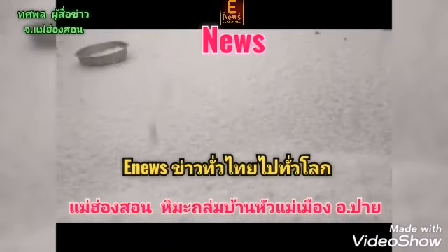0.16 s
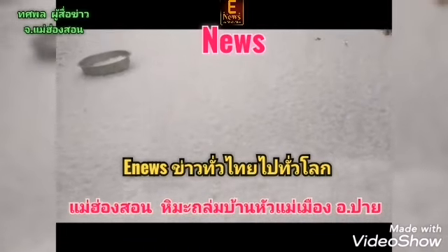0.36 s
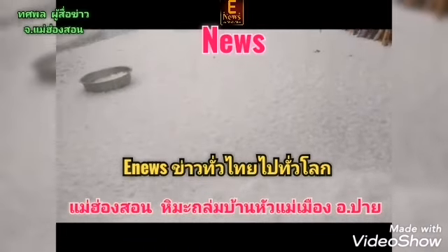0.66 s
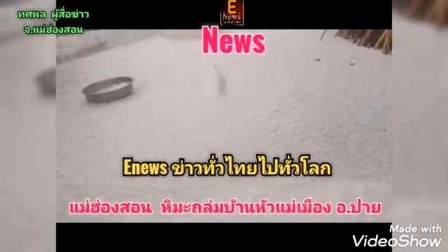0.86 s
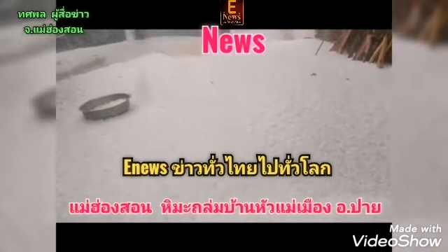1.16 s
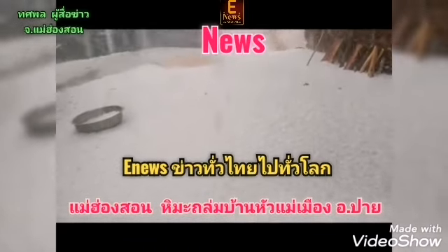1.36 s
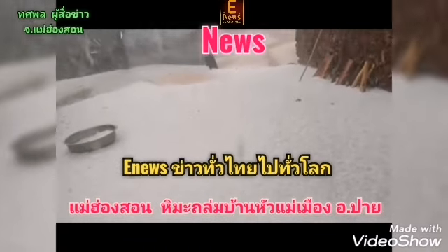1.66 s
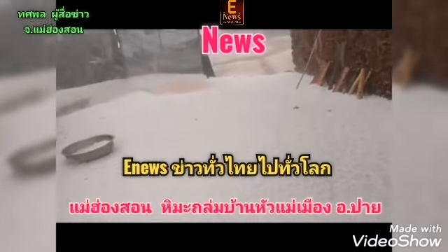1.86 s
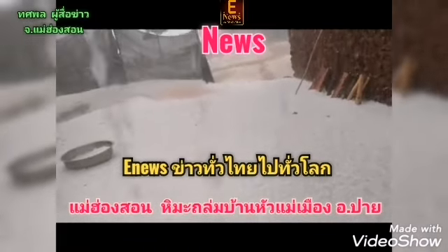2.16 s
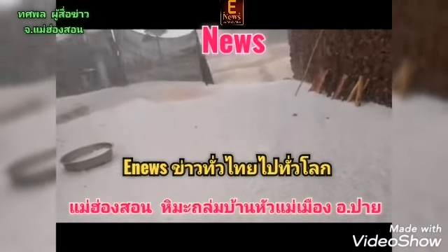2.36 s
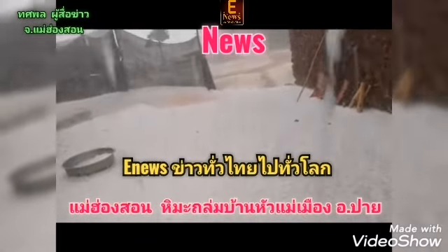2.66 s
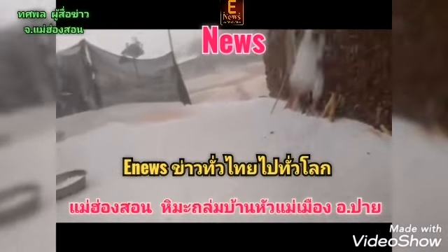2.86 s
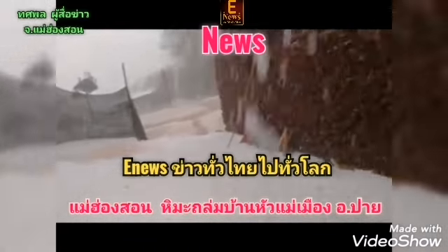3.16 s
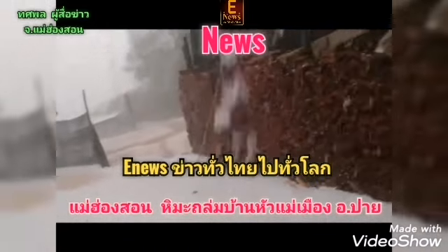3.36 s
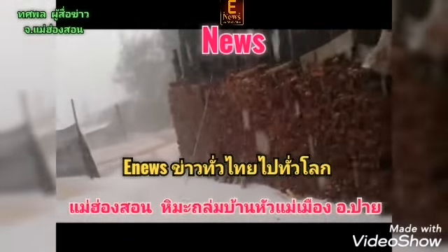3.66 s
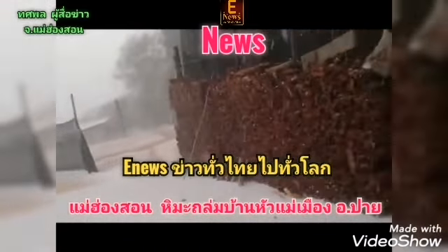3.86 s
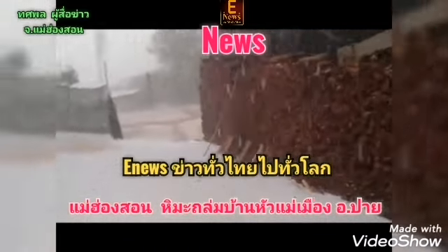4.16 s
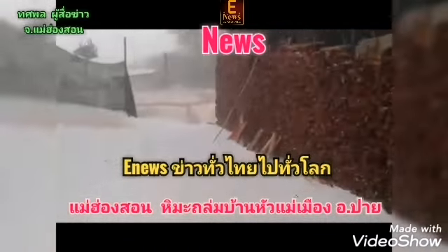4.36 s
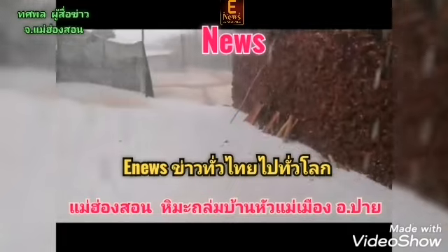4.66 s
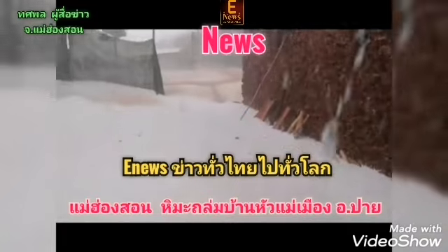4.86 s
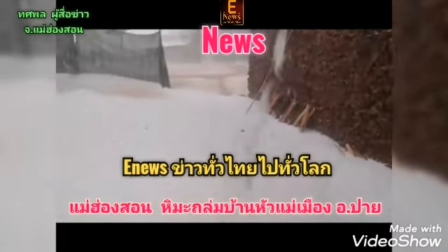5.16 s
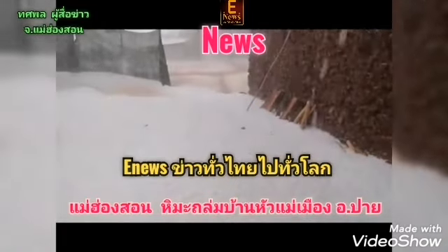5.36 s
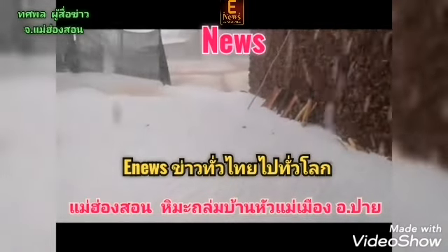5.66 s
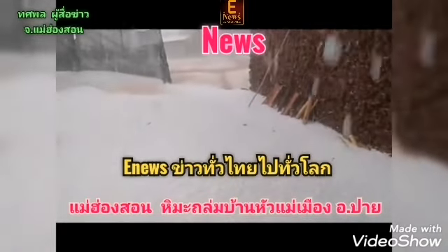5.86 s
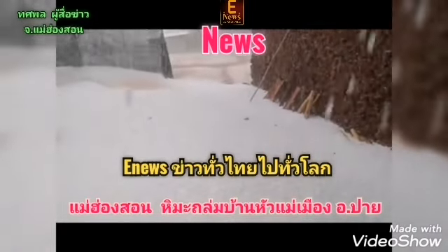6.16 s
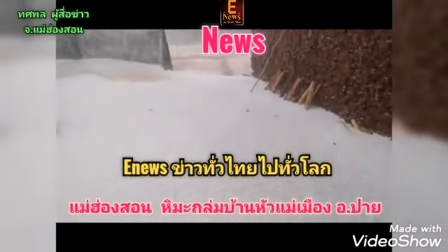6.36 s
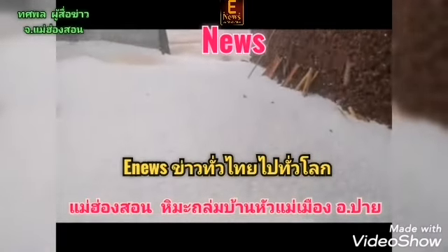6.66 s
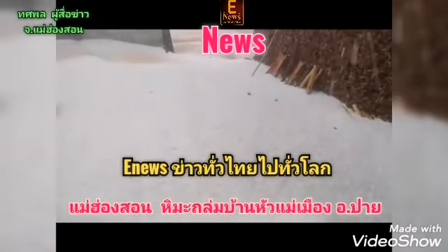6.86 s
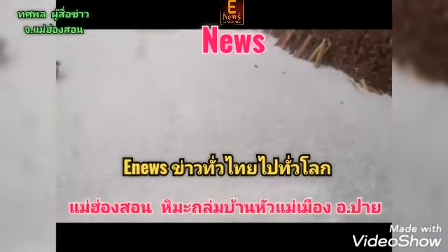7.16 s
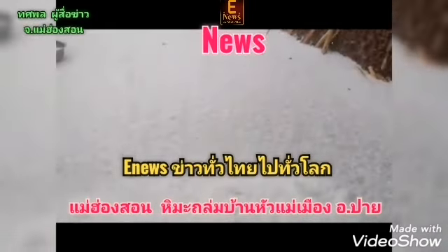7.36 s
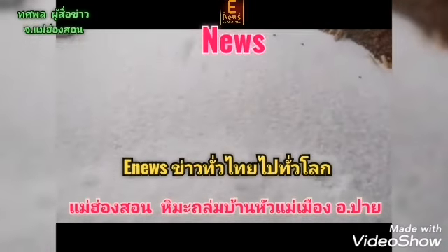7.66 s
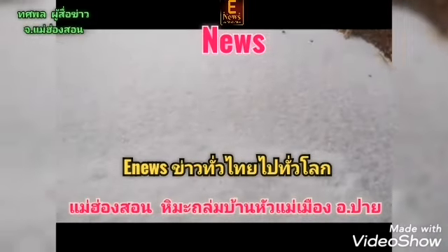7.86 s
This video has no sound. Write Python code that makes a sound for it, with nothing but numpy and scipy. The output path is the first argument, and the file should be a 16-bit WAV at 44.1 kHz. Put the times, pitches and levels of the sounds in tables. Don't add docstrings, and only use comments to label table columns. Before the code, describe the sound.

A loud, steady hissing roar of hail and downpour hammering metal sheets close above a phone microphone, fluttering slightly, without any pause.

```python
import sys
import numpy as np
from scipy import signal
from scipy.fft import rfft, irfft
from scipy.io import wavfile
from scipy.ndimage import uniform_filter1d

SR = 44100
rng = np.random.default_rng(int(sys.argv[2]) if len(sys.argv) > 2 else 0)


def unload_audio(sound):
    columns = np.transpose(np.atleast_2d(sound))
    steps = np.round(np.clip(columns, -1, 1) * 32767)
    wavfile.write(sys.argv[1], SR, steps.astype(np.int16))


def magnitude_from_level(level_db):
    exponent = np.asarray(level_db, float) / 20
    return 10 ** exponent


N = 352800
FRAME, GRID = 1024, 10


def gust_drift(rate_hz):
    hold = int(SR / rate_hz)
    steps = np.repeat(rng.standard_normal(N // hold + 1), hold)
    return 0.77 * uniform_filter1d(steps, hold)[:N]


def hail_blows(rate_hz, scatter_db):
    when, size, sign = rng.random((int(N / 2), 3)).T
    landed = np.arange(len(when)) < rate_hz * N / SR
    strength = magnitude_from_level(-scatter_db * np.log(1 - size))
    hits = landed * np.sign(sign - 0.5) * strength
    return np.bincount((when * N).astype(int), hits, N)


def heard_colour(hz):
    # frequency in Hz, level in dB per Hz.
    roof_colour = [(12, -40), (22, -12), (40, -20.5), (72, -15), (100, -17), (370, -12), (680, -9.5),
                   (900, -6), (1500, -4.5), (3600, -10), (4300, -12), (6500, -19), (8000, -19),
                   (13500, -19)]
    # centre in Hz, width in Hz, boost in dB.
    resonances = [
        (280, 10, 2),
        (322, 8.6, 2.5),
        (367, 6.6, 3),
        (890, 24, 1.5),
        (2405, 788, 12.5),
        (1050, 105, 2),
    ]
    colour_hz, colour_db = np.transpose(roof_colour)
    colour = magnitude_from_level(np.interp(np.log(hz), np.log(colour_hz), colour_db))
    for centre_hz, width_hz, db in resonances:
        colour = colour * magnitude_from_level(db * np.exp(-((hz - centre_hz) / width_hz) ** 2))
    return colour


def drumming_roof():
    # time in seconds, roar level in dB.
    hail_fall = [(0.0, -16.5), (0.42, -17.5), (0.51, -17), (0.56, -18.5), (2.03, -17.5), (4.68, -17.5),
                 (4.92, -19.5), (4.99, -17.5), (5.17, -20.5), (5.26, -18), (6.15, -18.5), (6.21, -17),
                 (6.46, -18.5), (6.75, -18), (7.98, -19), (8.0, -20)]
    time_s, fall_db = np.transpose(hail_fall)
    hz = np.maximum(np.arange(N // 2 + 1) * SR / N, 1)

    fade = np.exp(-np.arange(4096) / SR / 0.0039)
    smear = rfft(rng.standard_normal(4096) * fade, N)
    blows = rfft(hail_blows(rate_hz=15000, scatter_db=1.5)) * np.exp(1j * np.angle(smear))
    ringing = blows * heard_colour(hz)

    low = 1 / (1 + (hz / 750) ** 4)
    high = 1 / (1 + (3700 / hz) ** 4)
    body, drumming, spray = [irfft(ringing * share, N) for share in (1 - low - high, low, high)]

    roar_db = np.interp(np.arange(N) / SR, time_s, fall_db)
    swell_db = roar_db - roar_db.mean()
    drum_db = (0.19 - 1) * swell_db + 0.5 * gust_drift(4)
    spray_db = (0.97 - 1) * swell_db + 0.3 * gust_drift(4.26)
    drum_db = drum_db - drum_db.mean() + 1.4 * gust_drift(11)
    spray_db = spray_db - spray_db.mean() + 1.27 * gust_drift(30)
    together = body + drumming * magnitude_from_level(drum_db) + spray * magnitude_from_level(spray_db)
    return magnitude_from_level(roar_db - 0.4) * together / np.std(body)


def scene():
    return np.tile(drumming_roof(), (2, 1))


def lapped_waves(bins=640):
    n = np.arange(2 * FRAME)[:, None] + 0.5
    k = np.arange(bins) + 0.5
    fade = np.sin(np.pi * n / 2 / FRAME)
    return np.sqrt(2 / FRAME) * fade * np.cos(np.pi / FRAME * (n + FRAME / 2) * k)


def whistling_edges(mid):
    # edge number (32 bins apart), dB above the tile.
    edge_whistles = [(12, 1), (13, 6), (14, 1), (15, 6), (16, 10), (17, 13), (18, 10.5), (19, 44)]
    # time in seconds, level in dB.
    top_whistle = [
        (0, -49),
        (2.8, -51),
        (3.6, -49),
        (8, -43),
    ]
    for edge, db in edge_whistles:
        mid[:, 32 * round(edge)] *= magnitude_from_level(db)
    time_s, whistle_db = np.transpose(top_whistle)
    mid[:, 576] = np.sign(mid[:, 576]) * np.std(mid[:, 576])
    frame_s = np.arange(len(mid)) * FRAME / SR
    mid[:, 576] *= magnitude_from_level(np.interp(frame_s, time_s, whistle_db - whistle_db.mean()))


def thrifty_treble(mono, hold=0.3):
    tile_choices = [(192, .68, 0, 0), (196, .44, 0, 0), (216, .2, 0, 0), (264, .12, 0, 0),
                    (352, .17, .03, 0), (384, .44, .43, 0), (544, .3, .5, 0), (576, .62, .06, 0),
                    (580, .25, .08, .52), (592, .06, .06, .82), (600, .17, .01, .82)]
    # gain in dB, flicker in dB, width of a noise-filled frame (0-1).
    tile_sound = [(-1, 2.5, 0.3), (0, 2, 0.4), (-1, 3, 0.31), (0.5, 2.5, 0.44), (1, 4, 0.39), (-9, 4, 0.62),
                  (-8.5, 1.5, 0.6), (-4.5, 5.5, 0.64), (-5, 5, 0.56), (-14, 3, 0.9), (-44.5, 6.5, .02)]
    tiles = np.hstack([tile_choices, tile_sound])

    waves = lapped_waves()
    padded = np.pad(mono, (FRAME - GRID, FRAME - (N - GRID) % FRAME + FRAME))
    halves = padded.reshape(-1, FRAME)
    mid = np.hstack([halves[:-1], halves[1:]]) @ waves
    side, frames = np.zeros_like(mid), len(mid)
    mid[:, 616:] = 0
    whistling_edges(mid)
    mid[:, 384:416] *= magnitude_from_level(7.0)

    edges = [192, 196, 216, 240, 264, 292, *range(320, 577, 32), 580, 592, 600, 616]
    budget = rng.random(frames)
    for lo, hi in zip(edges, edges[1:]):
        _, keep, flip, drop, db, flicker_db, spread = tiles[tiles[:, 0] <= lo][-1]
        dice, stay = rng.random(frames), rng.random(frames)
        jolt = rng.standard_normal(frames)
        if lo < 240 or 576 < lo < 600:
            dice, stay = budget, np.roll(budget, 7)
        dice = dice[np.maximum.accumulate(np.arange(frames) * (stay > hold))]
        turn = np.where(dice < drop + keep, 0, np.where(dice > 1 - flip, 1, spread))
        turn = turn[:, None] * np.pi / 2
        gain = (magnitude_from_level(db + flicker_db * np.minimum(jolt, 1.2)) * (dice >= drop))[:, None]
        noise = mid[rng.permutation(frames), lo:hi] * rng.choice([-1, 1], (frames, hi - lo))
        unevenness = magnitude_from_level(1.6 * rng.standard_normal((frames, 1)))
        side[:, lo:hi] = unevenness * gain * np.sin(turn) * noise
        mid[:, lo:hi] *= gain * np.cos(turn)

    blocks = np.array([mid + side, mid - side]) @ waves.T
    joined = blocks[:, 1:, :FRAME] + blocks[:, :-1, FRAME:]
    first = blocks[:, :1, FRAME - GRID:FRAME].reshape(2, -1)
    return np.hstack([first, joined.reshape(2, -1)])[:, :N]


def roll_off(x):
    return signal.sosfilt(signal.butter(12, 13530, fs=SR, output="sos"), x)


def record(dry):
    power = uniform_filter1d(dry[0] ** 2, int(0.02 * SR))
    usual_power = uniform_filter1d(power, int(0.3 * SR))
    evened = dry[0] * (power / usual_power) ** -0.12
    rounded = np.tanh(1.6 * evened) / 1.6
    return roll_off(thrifty_treble(rounded))


dry = scene()
out = record(dry)
unload_audio(out)
```